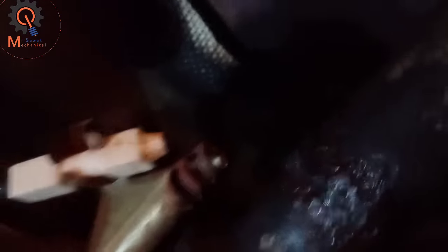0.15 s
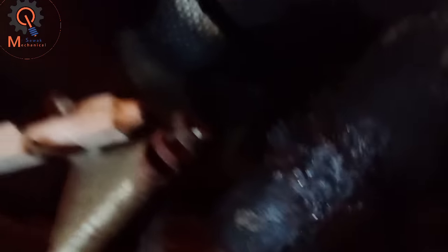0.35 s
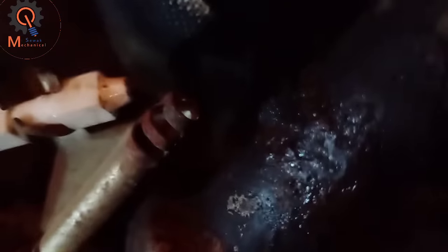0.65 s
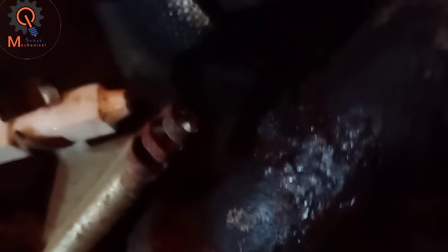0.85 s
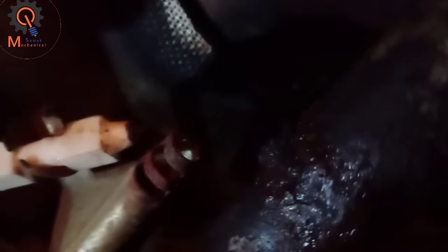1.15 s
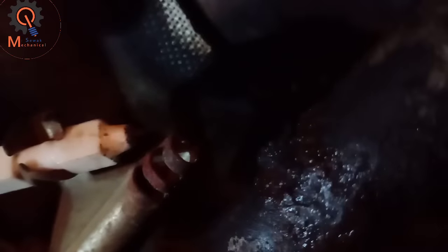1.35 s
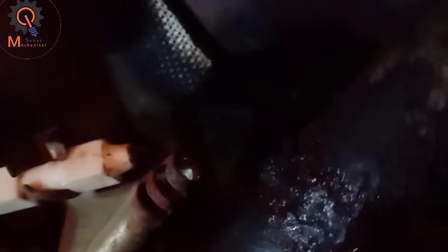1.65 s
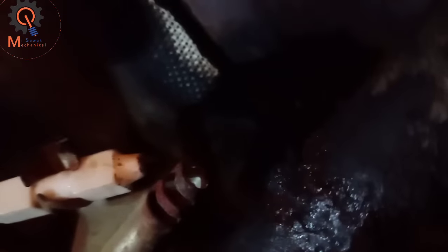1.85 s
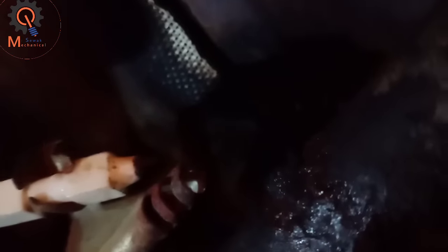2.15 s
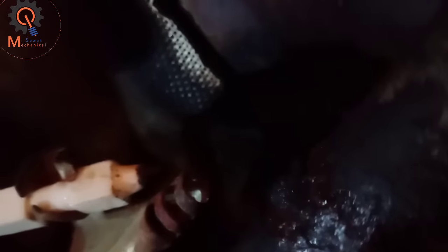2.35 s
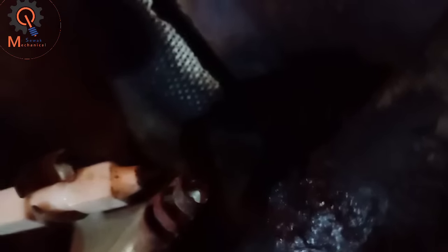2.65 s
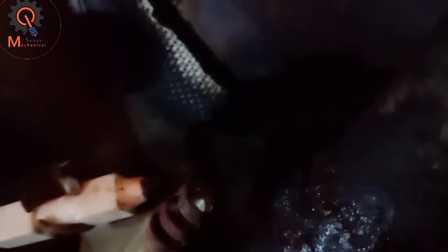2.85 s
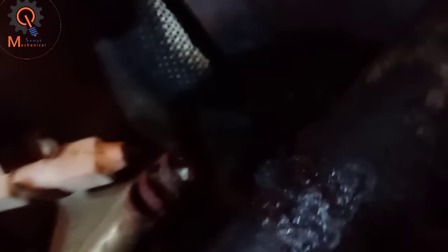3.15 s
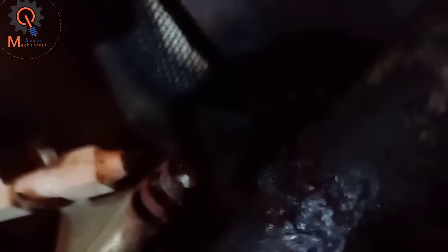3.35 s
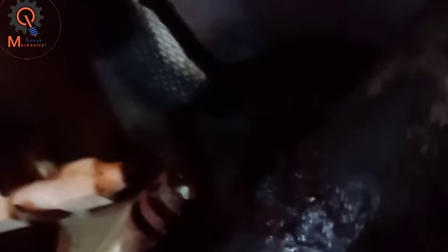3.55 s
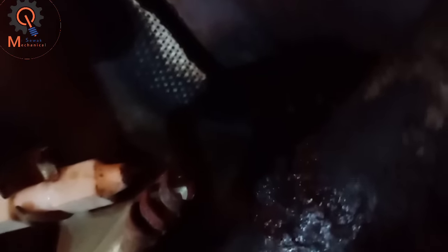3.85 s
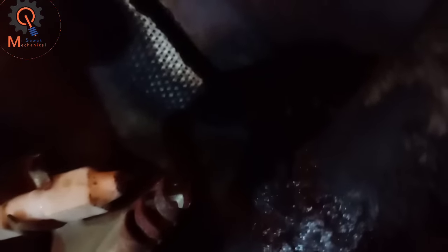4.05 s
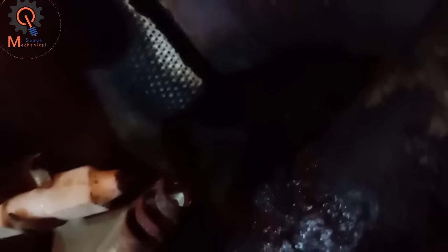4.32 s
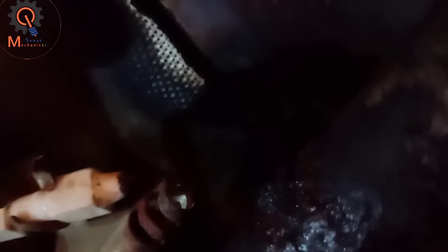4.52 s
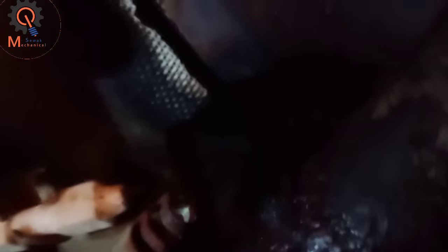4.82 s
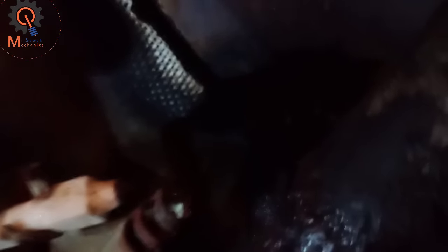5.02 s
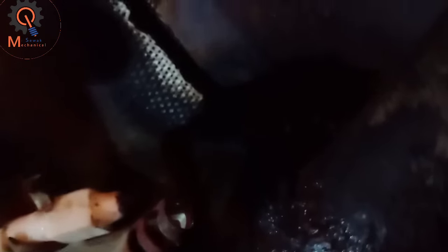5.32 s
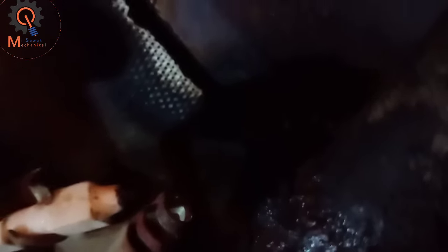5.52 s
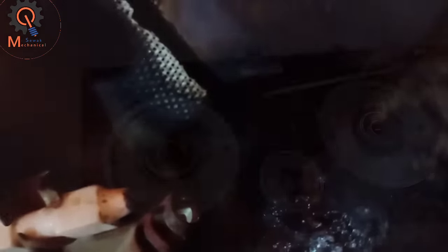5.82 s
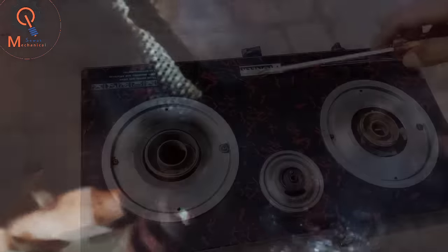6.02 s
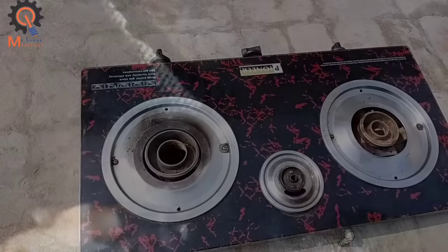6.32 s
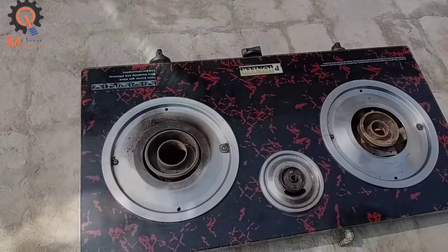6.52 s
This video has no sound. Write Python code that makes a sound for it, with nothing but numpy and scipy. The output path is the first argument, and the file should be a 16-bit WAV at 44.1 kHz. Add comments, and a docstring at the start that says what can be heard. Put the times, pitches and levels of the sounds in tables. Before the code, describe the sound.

Close by, a gas stove's igniter knob snaps loudly and unevenly, ringing the sheet-metal body, with dull knocks and faint hiss in a quiet room.

```python
"""Gas stove igniter

A hand works the igniter knob of a sheet-metal gas stove in a quiet, hard-walled room, heard from close by.
Snaps of the sprung striker are hard impulses and noise bursts, bright and loud; knob and valve knocks are
duller bursts. Decaying modes ring as the stove body, band-wise noise tails are the room. A faint hiss, likely
gas, and a rustle are noise that swells and fades; moving air is low noise and falling swings on the microphone.
"""
import sys
import numpy as np
from scipy import signal
from scipy.fft import rfft, irfft, next_fast_len
from scipy.io import wavfile
from scipy.ndimage import uniform_filter1d

SR = 44100
rng = np.random.default_rng(int(sys.argv[2]) if len(sys.argv) > 2 else 0)


def inscribe(sig):
    """Save sig as 16-bit PCM at rate SR to the path in sys.argv[1].

    A 1-D sig is mono; a 2-D sig holds one channel per row.
    Samples are clipped to [-1, 1] before scaling.
    """
    pcm = np.round(np.clip(np.atleast_2d(sig).T, -1, 1) * 32767)
    wavfile.write(sys.argv[1], SR, pcm.astype(np.int16))


N = 294543

# Striker snaps. Each row: start in seconds, thud, body and edge level in relative dB,
# room tail in dB re burst, burst decay in ms.
SNAPS = [(1.063, -9.5, -3, -0.5, -10, 5.6), (1.609, -27, -24.5, -13, -11, 3.8),
         (3.52, -8, -5, -3.5, -8.5, 5.6), (4.173, -36.5, -26.5, -16, -9.5, 15.6),
         (4.874, -11, -4.5, -6, -9.5, 5.4), (5.425, -40, -26, -13, -10.5, 9.5),
         (5.841, -12, -7, -4.5, -12.5, 6.9), (6.608, -39, -42.5, -24.5, -10.5, 4.3)]
# Modes of the sheet-metal body. Each row: frequency in Hz, level in relative dB, longest t60 in seconds.
STOVE_MODES = [(343.5, -1, 0.37), (446, -8.5, .3), (520.5, -7.5, .3), (663, 3.5, 0.2), (738, -15, 0.42),
               (923, -23, 0.083), (1000, -2.5, 0.38), (1095, -13, 0.094), (1284, -6.5, .2),
               (1391, -0.5, .2), (1703, -5.5, .2), (2070, -1.5, 0.084), (2660, -24, 0.082),
               (3870, -10.5, .15), (4370, -3.5, 0.12), (4400, -19.5, .3), (4570, -20, .3),
               (4920, -23.5, .3), (6600, -19.5, .3)]
# Frequencies in Hz where the thud, body, edge and top levels of a blow hold.
COLUMN_HZ = [380, 1400, 4300, 10000]


def from_db(db):
    """Decibels to gain."""
    return 10 ** (np.asarray(db) / 20)


def rms_one(x):
    """Scale to rms 1."""
    return x / np.sqrt(np.mean(x ** 2) + 1e-20)


def at_hz(points, hz):
    """Read a (Hz, value) table on a log-frequency axis."""
    table = np.array(points)
    return np.interp(np.log(hz), np.log(table[:, 0]), table[:, 1])


def drift(rate_hz):
    """Slow random curve of rms 1: white noise through two equal poles, run at SR / 40."""
    step = 40
    r = np.exp(-2 * np.pi * rate_hz * step / SR)
    white = rng.standard_normal(N // step + 2002)
    slow = signal.lfilter([1], [1, -2 * r, r * r], white)[2000:]   # settled part
    return np.interp(np.arange(N) / step, np.arange(len(slow)), rms_one(slow))


def bands(spectrum):
    """Yield centre Hz and noise of each quarter-octave band in a spectrum's range; neighbours unrelated."""
    edges_hz = 22 * 2 ** (np.arange(40) / 4)
    white = rng.standard_normal((2, N))
    for k, (low, high) in enumerate(zip(edges_hz, edges_hz[1:])):
        centre = np.sqrt(low * high)
        if spectrum[0][0] <= centre <= spectrum[-1][0] and at_hz(spectrum, low) > -50:
            sos = signal.butter(2, [low, high], "band", fs=SR, output="sos")
            yield centre, signal.sosfilt(sos, white[k % 2])


def bed(spectrum, patchy_db, rate_hz):
    """Noise of rms 1 whose bands flicker partly together."""
    together = drift(rate_hz)
    total = np.zeros(N)
    for hz, noise in bands(spectrum):
        flicker_db = patchy_db * (together + 0.6 * drift(rate_hz))
        total += from_db(at_hz(spectrum, hz) + flicker_db) * noise
    return rms_one(total)


def resonate(x, hz, width_hz):
    """Two-pole resonance, gain 1 on top."""
    r = np.exp(-np.pi * width_hz / SR)
    poles = [1, -2 * r * np.cos(2 * np.pi * hz / SR), r * r]
    return signal.lfilter([(1 - r * r) / 2, 0, (r * r - 1) / 2], poles, x)


def capsule_noise():
    """Steady coloured noise of the microphone capsule, unrelated between the channels."""
    # Spectrum. Each row: frequency in Hz, density in relative dB per Hz.
    capsule_spectrum = [(18, -31), (30, -1), (103, -1), (221, -3.5), (328, 0.5), (2480, -13), (3140, -18),
                        (4650, -9), (6720, -15), (7670, -27), (9220, -18.5), (14800, -25), (16000, -22)]
    level_db = -59   # rms
    size = next_fast_len(N)
    colour = from_db(at_hz(capsule_spectrum, np.arange(size // 2 + 1) * SR / size + 1))
    noise = irfft(rfft(rng.standard_normal((2, size))) * colour, size)[:, :N]
    return from_db(level_db) * rms_one(noise)


def wash(t):
    """Gain of the noise each snap leaves behind: climbs to a late peak, falls fast."""
    peak_s, rise_db_s, fall_db_s = 0.13, 81, 204
    out = np.zeros(N)
    for s, _, body_db, *_ in SNAPS:
        late_s = t - s - peak_s
        slope_db_s = np.where(late_s < 0, rise_db_s, -fall_db_s)
        out += (t > s) * from_db(body_db + slope_db_s * late_s)
    return out


def gust_gain(t):
    """Gain of the rumble: still air plus a swell for each gust, tent-shaped in dB."""
    # Gusts over the microphone. Each row: peak in seconds, peak level in dB, half length in seconds.
    gust_rows = [(0.22, -35.5, 0.12), (0.58, -48, 0.057), (0.853, -50, 0.06), (1.932, -56, 0.056),
                 (1.42, -51, .08), (2.321, -55.5, .08), (2.5, -54.5, 0.052), (3.05, -47, 0.29),
                 (3.22, -50, 0.047), (3.862, -43, 0.077), (4.095, -51, 0.043), (4.754, -48, 0.05),
                 (5.2, -44.5, 0.13), (5.75, -51.5, 0.086), (6.236, -36, 0.048), (6.442, -34.5, 0.16)]
    still_air_db, fall_db = -69, 11.5   # fall: loss at the half length
    gain = from_db(still_air_db)
    for s, db, half_s in gust_rows:
        gain = gain + from_db(db - fall_db * np.abs(t - s) / half_s)
    return gain


def air_rumble(t, after):
    """Moving air on the microphone: low noise with two resonances, lifted by gusts and the snap wash."""
    # Spectrum. Each row: frequency in Hz, density in relative dB per Hz.
    rumble_spectrum = [(12, -52), (20, -44), (53, -2), (103, -1.5), (251, -10), (483, -14.5), (528, -8),
                       (700, -19.5), (910, -54), (1540, -120)]
    # Low resonances. Each row: frequency in Hz, width in Hz, gain in dB.
    boom_rows = [(75, 17, 3.5), (117, 22, 4.5)]
    wash_db = -38   # re snap body level
    air = bed(rumble_spectrum, patchy_db=0.5, rate_hz=6.4)
    boom = sum(from_db(db) * resonate(air, hz, width_hz) for hz, width_hz, db in boom_rows)
    return np.hypot(gust_gain(t), from_db(wash_db) * after) * rms_one(air + boom)


def puffs():
    """Each puff pushes the diaphragm, which swings for a few cycles of falling pitch."""
    # Puffs of air on the microphone. Each row: start in seconds, level in dB, starting pitch in Hz.
    puff_rows = [(0.162, -18.5, 257), (0.18, -22, 232), (0.5, -28.5, 110), (1.119, -23, 75),
                 (2.623, -35, 77.6), (2.644, -33, 85.6), (2.699, -42, 96.9), (3.445, -32, 245),
                 (4.681, -32, 62.4), (4.977, -26, 128), (6.182, -23, 155), (6.251, -22.5, 122.5),
                 (6.274, -27, 85.5), (6.299, -29, 261), (6.327, -27, 126), (6.403, -24.5, 117),
                 (6.424, -20, 122), (6.469, -19.5, 192), (6.488, -22, 166), (6.508, -27, 152.4),
                 (6.542, -32, 85)]
    cycles_at_120_hz, cycles_per_octave = 2, 0.73   # quicker swings last more cycles
    out, t = np.zeros(N + SR), np.arange(SR // 8) / SR
    signs = rng.choice([-1, 1], len(puff_rows))
    for (s, level_db, hz), sign in zip(puff_rows, signs):
        cycles = cycles_at_120_hz + cycles_per_octave * np.log2(hz / 120)
        u = t * hz / cycles * np.e
        turn = 2 * np.pi * hz * t * (1 - 2.3 * t)
        swing = u * np.exp(1 - u) * np.sin(turn + 0.77 * np.sin(turn))   # lopsided, so overtones show
        start = round(s * SR)
        out[start:start + len(t)] += sign * from_db(level_db) * swing
    return out[:N]


def rustle_gain(t, after):
    """Gain of the room rustle: level curve and snap wash added as powers."""
    # Level curve. Each row: time in seconds, level in dB.
    level_rows = [(0.0, -47), (0.3, -44.5), (0.54, -42), (0.62, -55), (0.85, -53), (0.95, -67.5),
                  (1.33, -59.5), (1.47, -40), (1.8, -56), (2.079, -47), (2.29, -62), (2.55, -47.5),
                  (2.71, -68.5), (2.99, -34), (3.25, -51), (3.85, -51.5), (4.18, -43.5), (4.41, -66.5),
                  (4.52, -50), (4.76, -48.5), (5.23, -44), (5.47, -39.5), (5.62, -57.5), (5.8, -52),
                  (6.14, -50), (6.3, -45), (6.68, -52)]
    wash_db = -31   # re snap body level
    return np.hypot(from_db(np.interp(t, *np.transpose(level_rows))), from_db(wash_db) * after)


def room_rustle(gain):
    """Room rustle: patchy band noise under its gain."""
    # Spectrum. Each row: frequency in Hz, density in relative dB per Hz.
    rustle_spectrum = [(88, -30.5), (150, -11), (246, -26.5), (337, 13), (444, -0.5), (708, 3), (1370, 2.5),
                       (1800, -13), (2470, -14.5), (3080, -46), (4000, -6.5), (5200, -43.5), (8800, -120)]
    return gain * bed(rustle_spectrum, patchy_db=4.5, rate_hz=9.9)


def hiss_gain(t, after):
    """Gain of the hiss: level curve and snap wash added as powers."""
    # Level curve. Each row: time in seconds, level in dB.
    level_rows = [(0.0, -56), (0.24, -47.5), (0.43, -43), (0.56, -53.5), (0.75, -50), (1.02, -57.5),
                  (1.56, -61), (1.69, -40.5), (1.8, -47.5), (2.08, -58), (2.18, -71), (2.5, -79.5),
                  (2.71, -48.5), (2.86, -43.5), (3.2, -43.5), (3.3, -58), (3.6, -54), (3.8, -44.5),
                  (4.13, -44.5), (4.3, -57.5), (4.7, -69), (5.3, -52), (5.6, -66.5), (5.8, -51), (6.2, -61),
                  (6.45, -53), (6.68, -54.5)]
    wash_db = -31.5   # re snap body level
    return np.hypot(from_db(np.interp(t, *np.transpose(level_rows))), from_db(wash_db) * after)


def gas_hiss(gain):
    """Hiss, likely gas: treble-weighted band noise under its gain."""
    # Spectrum. Each row: frequency in Hz, density in relative dB per Hz.
    hiss_spectrum = [(900, -14), (1500, -4.5), (2300, -2.5), (3100, -1), (4300, 0), (6500, -10),
                     (7500, -16.5), (10000, -19), (16000, -23.5)]
    return gain * bed(hiss_spectrum, patchy_db=2.0, rate_hz=8.4)


def stove_sings(rustle, hiss):
    """Rustle keeps the low modes of the body faintly sounding, hiss the high ones."""
    width_hz, split_hz, rustle_db, hiss_db = 22, 3000, -6, -10.5
    white = rng.standard_normal(N)
    low, high = np.zeros(N), np.zeros(N)
    for hz, db, _ in STOVE_MODES:
        mode = from_db(db) * resonate(white, hz, width_hz)
        if hz > split_hz:
            high += mode
        else:
            low += mode
    return from_db(rustle_db) * rustle * rms_one(low) + from_db(hiss_db) * hiss * rms_one(high)


def all_blows():
    """Rows of (s, thud, body, edge, top, tail dB, burst, rise ms); top and rise come from the kind of blow."""
    # Knob and valve knocks. Each row: start in seconds, thud, body and edge level in relative dB,
    # room tail in dB re burst, burst decay in ms.
    knock_rows = [(0.082, -29, -29.5, -41.5, -6.5, 9.4), (0.157, -15, -27.5, -49.5, -9, 20),
                  (0.224, -31.5, -45, -44.5, -2, 6.1), (0.389, -38.5, -45.5, -47, 0.5, 4.5),
                  (0.692, -35, -44, -43, -10, 13), (0.983, -49.5, -55, -64, 0, 8.4),
                  (1.334, -33, -54, -53, -20, 14), (1.399, -30.5, -26, -46, -14, 11.8),
                  (1.462, -41, -19.5, -40.5, -13.5, 6.6), (1.509, -27, -69, -56, -28, 5.5),
                  (1.853, -39, -30, -58, -8, 6.3), (2.045, -45.5, -37.5, -60, -1.5, 4),
                  (2.307, -41, -41, -66, -6.5, 8.1), (2.434, -39.5, -28.5, -33, -13, 9),
                  (2.819, -35, -24.5, -33.5, -14, 8), (2.968, -28, -26, -24.5, -24, 10.3),
                  (2.991, -31, -21, -21.5, -21, 6.6), (3.161, -38, -35, -40, -1.5, 4.2),
                  (3.211, -30.5, -34, -63, -23, 13), (3.354, -48, -39, -37, -8.5, 7.5),
                  (3.395, -32, -43, -57, -18, 9), (3.446, -17.5, -28, -37.5, -34, 18.4),
                  (3.761, -26.5, -33, -40, -21, 10.6), (3.796, -27.5, -13.5, -26, -14, 9.3),
                  (4.39, -61, -42, -47, -17, 4.6), (4.429, -38.5, -36, -47, -5.5, 7.6),
                  (4.509, -45, -28, -44.5, -18, 6.1), (4.632, -53, -48, -46, -8.5, 7.9),
                  (4.664, -18, -18.5, -17.5, -9.5, 9.1), (4.701, -23, -30, -22.5, -32, 5.8),
                  (5.08, -21, -29.5, -44, -4, 2.6), (5.129, -23.5, -8, -22, -18.5, 10),
                  (5.309, -53, -35, -36, -15, 4.9), (5.351, -60, -48, -42, -14, 8.3),
                  (5.387, -64, -37, -30, -20, 6.8), (5.664, -30.5, -37, -43.5, -1.5, 11),
                  (5.72, -46, -24, -22, -24, 5.9), (6.076, -44, -37.5, -47, -20, 13),
                  (6.148, -24.5, -28, -32.5, -13.5, 12.4), (6.368, -29, -28, -31, -26, 12),
                  (6.379, -30, -18.5, -27.5, -14, 11.2)]
    kinds = [(SNAPS, -4, 0.76), (knock_rows, -12.5, 4.5)]   # top in dB re edge, contact rise in ms
    return np.array([(s, thud, body, edge, edge + top_db, tail, burst, rise_ms)
                     for rows, top_db, rise_ms in kinds
                     for s, thud, body, edge, tail, burst in rows])


def strengths(blows, hz):
    """Gain of each blow at one frequency, from its four level columns."""
    return from_db([at_hz(list(zip(COLUMN_HZ, b[1:5])), hz) for b in blows])


def dying(starts, power, t60_s):
    """Power that jumps at each start and decays exponentially."""
    x = np.full(N, 1e-18)
    np.add.at(x, starts, power)
    return signal.lfilter([1], [1, -from_db(-120 / (t60_s * SR))], x)


def one_pole(x, tau_s):
    """Smooth with one pole of the given time constant."""
    keep = np.exp(-1 / (SR * tau_s))
    return signal.lfilter([1 - keep], [1, -keep], x)


def blows_in_room(blows):
    """Each blow is a short noise burst, then a diffuse tail that dies band by band."""
    # Spectrum of a blow between its level columns. Each row: frequency in Hz, density in relative dB per Hz.
    blow_spectrum = [(70, -23.5), (130, -17.5), (250, -18.5), (340, -13.5), (700, 0.5), (1350, 6.5),
                     (2200, -5.5), (3100, -11), (4300, -9.5), (7000, -16), (10000, -13), (16000, -22)]
    # Decay of the room. Each row: frequency in Hz, t60 in seconds.
    room_t60 = [(200, 0.28), (530, 0.36), (1390, 0.26), (3680, 0.25), (9700, 0.19), (15000, 0.18)]
    starts, out = (blows[:, 0] * SR).astype(int), np.zeros(N)
    t = np.arange(round(0.08 * SR)) / SR
    burst_s, rise_s = blows[:, 6:].T[:, :, None] / 1000
    shape = np.exp(-t / burst_s) * (1 - np.exp(-(t / rise_s) ** 2))   # softer contacts rise slower
    where = np.minimum(starts[:, None] + np.arange(len(t)), N - 1)
    tail_starts = starts + (rise_s[:, 0] * SR).astype(int)
    column_level = [(hz, at_hz(blow_spectrum, hz)) for hz in COLUMN_HZ]
    lumps = from_db(1.1 * drift(210.0))   # loose parts and single echoes make the decay uneven
    for hz, noise in bands(blow_spectrum):
        colour_db = at_hz(blow_spectrum, hz) - at_hz(column_level, hz)
        power = (strengths(blows, hz) * from_db(colour_db + 14)) ** 2
        burst = np.zeros(N)
        np.add.at(burst, where, power[:, None] * shape ** 2)
        burst = one_pole(burst, 0.4 / hz)   # lows cannot start as fast
        tail = dying(tail_starts, power * from_db(2 * blows[:, 5]), at_hz(room_t60, hz))
        tail = one_pole(tail, 0.00052 + 4.1 / hz)   # the lows build up later
        out += np.sqrt(burst + tail) * lumps * noise
    return out


def stove_ring(blows):
    """Every blow strikes each decaying mode of the body with a strength of its own."""
    ring_db, luck_db = -12, 3
    starts, out = ((blows[:, 0] + blows[:, 7] / 1000) * SR).astype(int), np.zeros(N)
    luck = from_db(luck_db * rng.standard_normal((len(blows), len(STOVE_MODES))))
    for k, (hz, level_db, t60_s) in enumerate(STOVE_MODES):
        clicks = np.full(N, 1e-18)
        clicks[starts] = strengths(blows, hz) * luck[:, k] * from_db(level_db + ring_db)
        capped_s = min(t60_s, 6 / np.sqrt(hz))   # thin sheet loses its treble soonest
        r, w = from_db(-60 / (capped_s * SR)), 2 * np.pi * hz / SR
        out += signal.lfilter([0, np.sin(w)], [1, -2 * r * np.cos(w), r * r], clicks)
    return out


def striker_cracks():
    """The hammer's first contact is four hard impulses; the latch ticks just ahead of it."""
    latch_lead_s, latch_db, crack_db = 0.002, 0.5, 30.5   # impulse sizes re edge level, before the band filter
    snaps, out = np.array(SNAPS), np.zeros(N)
    chance = rng.random((len(snaps), 8))
    lag_s = np.cumsum(0.00033 + 0.00077 * chance[:, :4], axis=1)
    size = from_db(snaps[:, 3:4] + crack_db - 5.1 * np.arange(4))   # each impulse weaker
    sign = np.sign(chance[:, 4:] - 0.5)
    np.add.at(out, ((snaps[:, :1] + lag_s) * SR).astype(int), size * sign)
    out[((snaps[:, 0] - latch_lead_s) * SR).astype(int)] = from_db(snaps[:, 3] + latch_db)
    return signal.sosfilt(signal.butter(2, [3500, 5200], "band", fs=SR, output="sos"), out)


def scene():
    """One source close to the microphone, the same in both channels."""
    t, blows = np.arange(N) / SR, all_blows()
    after = wash(t)
    rustle, hiss = rustle_gain(t, after), hiss_gain(t, after)
    mid = air_rumble(t, after) + puffs()
    mid += room_rustle(rustle) + gas_hiss(hiss) + stove_sings(rustle, hiss)
    mid += blows_in_room(blows) + stove_ring(blows) + striker_cracks()
    return np.array([mid, mid])


def microphone(x):
    """Microphone and its port: a chain of resonant peaks and dips."""
    # Peaks and dips. Each row: frequency in Hz, width in Hz, boost in dB.
    port_rows = [(2530, 120, 3.5), (3200, 870, -6), (3740, 47, 1.5), (4980, 170, 1), (6220, 110, -0.5),
                 (4360, 1100, -0.5), (5570, 680, -7), (6490, 1600, 6.5), (7840, 844, -19.5),
                 (9170, 2600, 1), (12870, 2900, -15), (15060, 2200, 11)]
    for hz, width_hz, boost_db in port_rows:
        a, w = from_db(boost_db / 2), 2 * np.pi * hz / SR
        q = np.tan(np.pi * width_hz / SR)
        x = signal.lfilter([1 + q * a, -2 * np.cos(w), 1 - q * a], [1 + q / a, -2 * np.cos(w), 1 - q / a], x)
    return x


def power_db(x, size):
    """Mean power over a centred window of samples, in dB."""
    return 10 * np.log10(uniform_filter1d(x ** 2, size=size) + 1e-12)


def record(dry):
    """Port colour, low cut, compressor that ducks on loud sound, capsule noise, clipped peaks, top cut."""
    low_cut_hz, cutoff_hz = 46, 15650
    limit_db, release_db_s, squeeze = -21.5, 166, 0.75   # squeeze: dB cut per dB over the limit
    heard = signal.sosfilt(signal.butter(2, low_cut_hz, "high", fs=SR, output="sos"), microphone(dry))
    cut_db = squeeze * np.maximum(power_db(heard.mean(axis=0), 300) - limit_db, 0)
    ramp_db = release_db_s * np.arange(N) / SR
    held_db = np.maximum.accumulate(cut_db + ramp_db) - ramp_db   # recovers at the release rate
    late_db = signal.lfilter([0.004], [1, 0.004 - 1], held_db)   # the first crack slips through
    loud_db = np.maximum(power_db(heard[0], 2000) + 42, 0)
    floor = capsule_noise() * from_db(-1.5 * loud_db)   # the noise suppressor shuts it under loud sound
    clipped = np.clip(heard * from_db(-late_db) + floor, -1, 1)
    return signal.sosfilt(signal.ellip(8, 0.5, 45, cutoff_hz, fs=SR, output="sos"), clipped)


dry = scene()
out = record(dry)
inscribe(out)
```